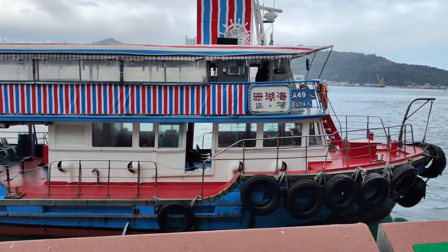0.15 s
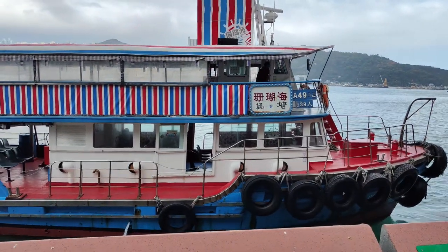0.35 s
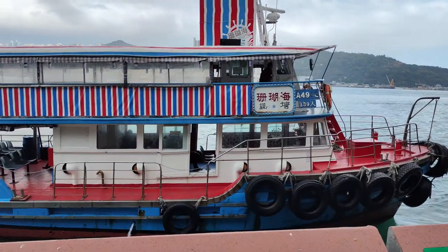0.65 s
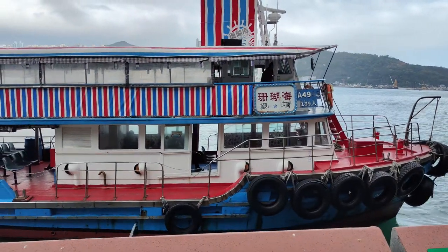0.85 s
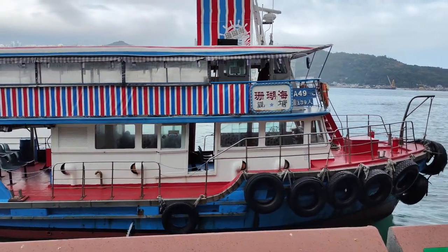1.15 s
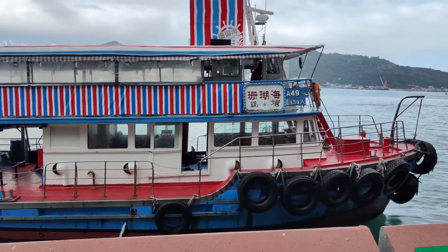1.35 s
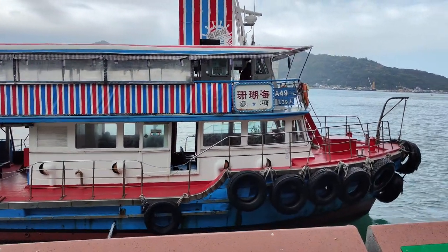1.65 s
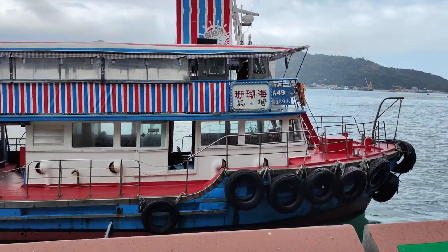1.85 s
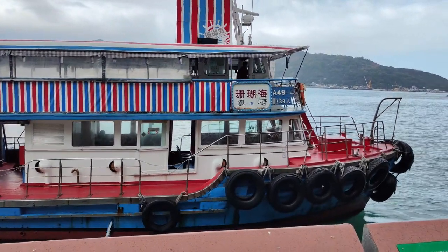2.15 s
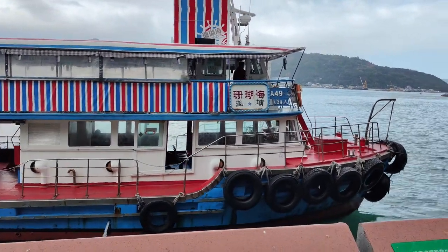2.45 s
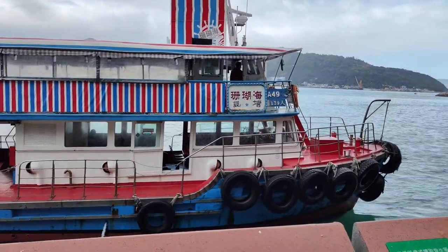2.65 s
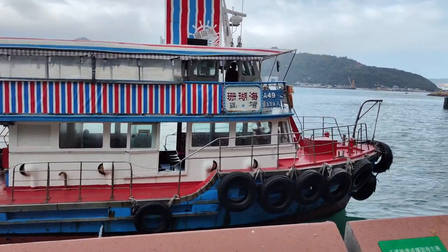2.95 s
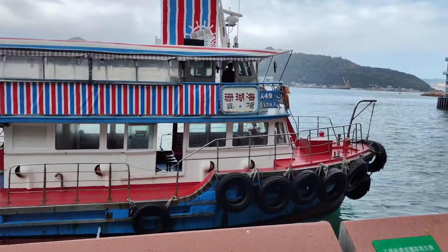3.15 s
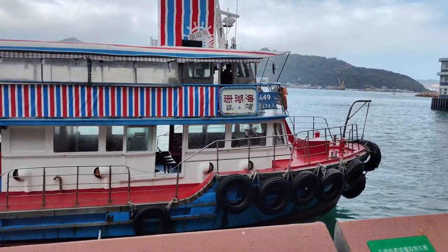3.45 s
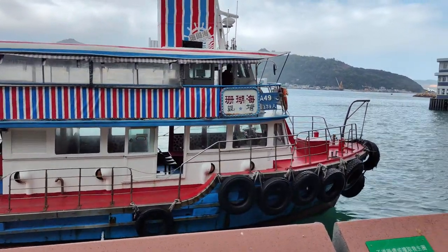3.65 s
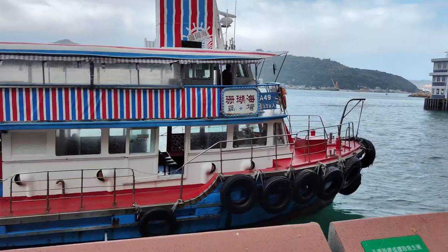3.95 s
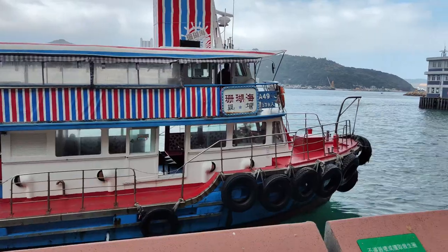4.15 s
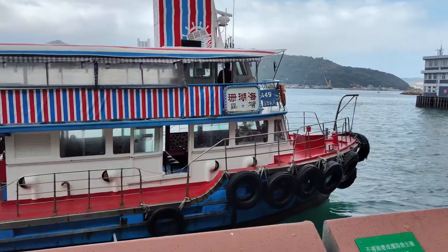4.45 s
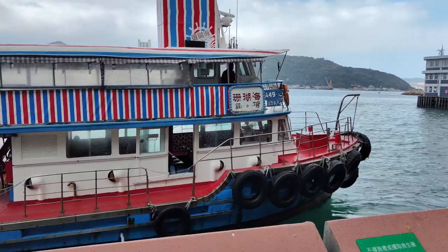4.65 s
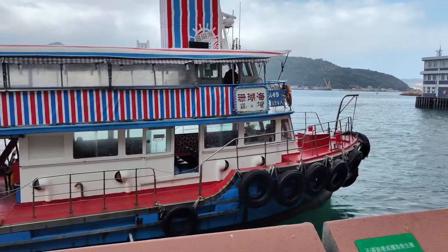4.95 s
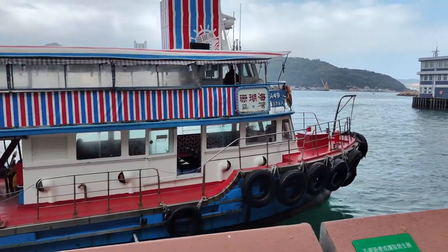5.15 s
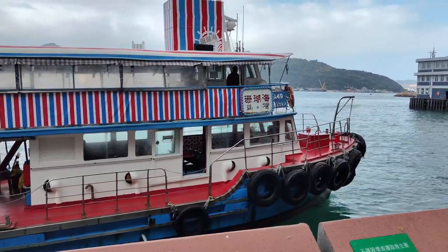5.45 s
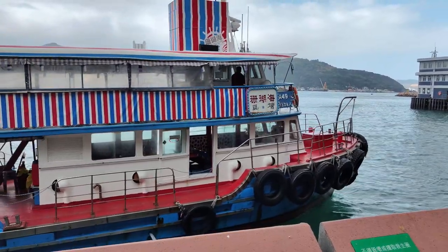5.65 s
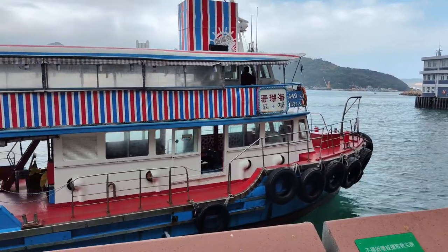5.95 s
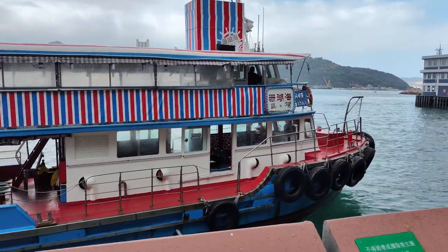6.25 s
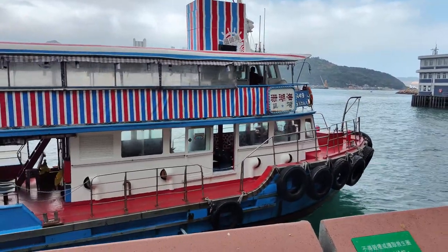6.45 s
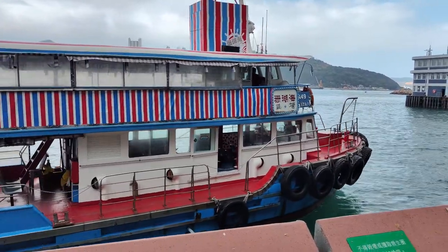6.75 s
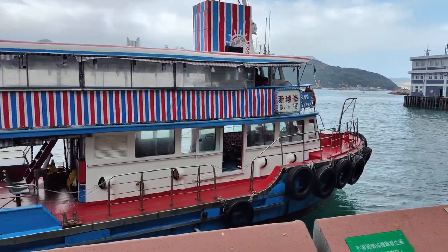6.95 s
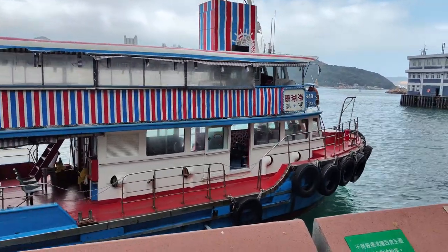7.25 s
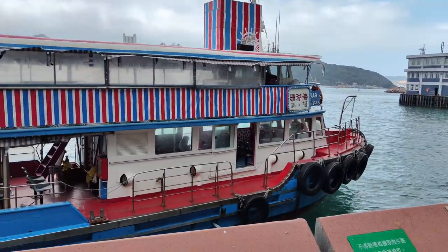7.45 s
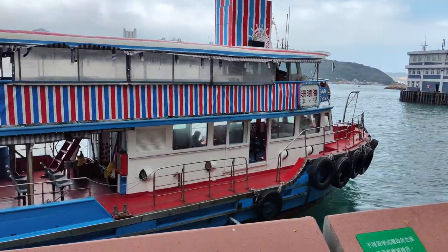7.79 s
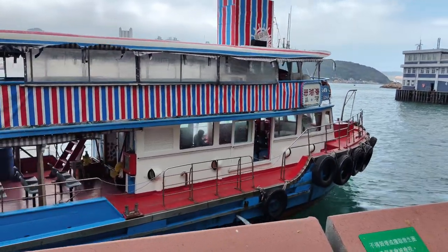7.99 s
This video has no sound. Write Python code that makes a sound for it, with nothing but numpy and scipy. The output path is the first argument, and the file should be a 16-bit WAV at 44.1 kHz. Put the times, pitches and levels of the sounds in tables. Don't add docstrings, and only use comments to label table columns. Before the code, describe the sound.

A small ferry's six-cylinder diesel runs continuously a few metres away in open harbour air, captured in plain phone stereo. From 0 to 3 seconds it is a deep, fairly smooth drone around 61 Hz with strong low harmonics, slightly wavering, beside steady generator and pump hums, one fading early and another fading after 3.4 seconds. From about 3 to 3.5 seconds the pitch rises to roughly 65 Hz, and low hollow water slaps sound near 3.1, 4.2 and 5 seconds. From 4 to 5.5 seconds the engine grows rougher, with a lumpy throb; propeller churn and watery hiss swell modestly, strongest around 5 to 5.6. Near 5.7 the pitch dips and smooths, then from 6.6 climbs again to about 68 Hz, lumpy once more, cutting off still running at 8.1. Fine bubbling and dull hull rumble stay quietly underneath throughout.

```python
import sys
import numpy as np
from scipy import signal
from scipy.fft import rfft, irfft, next_fast_len
from scipy.io import wavfile
from scipy.ndimage import uniform_filter1d

SR = 44100
rng = np.random.default_rng(int(sys.argv[2]) if len(sys.argv) > 2 else 0)


def unload_audio(sound):
    columns = np.transpose(np.atleast_2d(sound))
    steps = np.round(np.clip(columns, -1, 1) * 32767)
    wavfile.write(sys.argv[1], SR, steps.astype(np.int16))


def volts(x):
    e = np.asarray(x, float) / 20
    return 10 ** e


N = 358091

# time in seconds, firing rate in Hz.
FIRING_RATE = [(0, 59.67), (.3, 60.9), (1.5, 60.96), (2.4, 61.16), (2.74, 60.93), (2.91, 61.13),
               (3.25, 62.46), (3.51, 64.84), (4.7, 66.62), (4.86, 67.27), (5.5, 67.12), (5.71, 64.86),
               (5.88, 64.07), (6.54, 63.87), (7.2, 66.66), (7.6, 67.36), (8.12, 68.46)]
# level in dB running light, level in dB under load.
ORDER_DB = [(-73, -70), (-64.5, -53), (-37.7, -35.8), (-55, -49.5), (-56, -48.5), (-19, -18), (-51, -41.5),
            (-60, -54.5), (-55, -47), (-55, -52), (-53, -42), (-24.5, -34.5), (-59, -54), (-60, -60),
            (-52, -43), (-48.5, -31.5), (-54, -47), (-30, -43), (-46.5, -46.5), (-59.5, -56), (-54, -39),
            (-57, -43), (-58, -44), (-42.5, -49.5), (-51, -58), (-73, -58.5), (-57.5, -49), (-66.5, -55),
            (-68, -55), (-58, -61)]
# time in seconds, firing tone in dB, pulse sharpness in dB,
# unevenness of the cylinders (0-1).
EFFORT = [(0.0, -19.88, 0.24, 0.17), (0.7, -20.25, 3.4, 0.31), (1.45, -17.19, -0.17, 0.06),
          (1.75, -17.46, -3.0, -0.01), (2.7, -20.11, 2.87, 0.15), (3.15, -19.26, -0.61, 0.04),
          (3.9, -18.55, 1.28, 0.36), (4.15, -18.49, -3.42, 0.86), (4.35, -18.63, 5.66, 0.79),
          (4.7, -19.16, 1.01, 0.86), (4.9, -23.62, 3.24, 1.0), (5.15, -19.14, -1.59, 1.11),
          (5.75, -17.97, -5.85, 0.03), (5.95, -19.31, 2.45, 0.49), (6.3, -17.49, 0.44, 0.37),
          (7.0, -16.2, -2.08, 0.68), (7.35, -16.29, -7.96, 0.87), (8.12, -18.32, 4.06, 0.89)]
FUNNEL_RATES_HZ = (61, 64, 66.5)
# order, level in dB at each of the three rates, share of the sharpness (0-1).
FUNNEL = [
    (12, -25.3, -28, -35.5, 1),
    (18, -31, -31, -43.5, 1),
    (21, -54, -40.7, -38.8, .5),
    (24, -43.5, -40, -49.5, .6),
]
# order, level in dB even, level in dB uneven.
LUMPS = [
    (16, -52, -28),
    (23, -60, -41),
    (33, -61, -51),
]
# order, centre in seconds,
# half-length in seconds, gain in dB.
PLATES = [(24, .9, .15, 4), (36, .7, .4, 10), (18, 2.25, .15, 2), (30, 2.6, .42, 11), (37, 2.55, .35, 13),
          (24, 3.15, .25, 3), (36, 3.2, .4, 15), (12, 3.9, .2, 3), (21, 4.9, .25, 3), (23, 4.9, .25, 3),
          (36, 5.1, .2, 6), (12, 5.35, .25, -6), (16, 5.45, .12, 4), (30, 6, .2, 12), (24, 6.4, .3, 2)]
# frequency in Hz, level in dB, fade-out time in seconds,
# wobble in dB, starting phase in radians.
AUXILIARY = [
    (65.5, -31, 3.4, .7, 2.2),
    (75.55, -37, 9, 2.5, -1.7),
    (152.4, -39, 1.5, 1.2, 1.),
    (137.5, -50, 9, 3., 0.),
]
# time in seconds, wash level in dB.
CHURN = [(0, -54), (1.6, -57.5), (2.15, -55.5), (3.04, -56), (3.65, -52), (3.96, -54), (4.49, -53.5),
         (5.05, -48.5), (5.25, -50.5), (5.63, -47), (5.8, -50.5), (6.6, -52.5), (7.55, -56.5),
         (7.89, -53.5), (8.12, -55)]
# frequency in Hz, density in dB per Hz.
RUMBLE = [(14, -69), (22, -60.5), (45, -59), (70, -55.5), (90, -65), (125, -61.5), (165, -63), (280, -71.5),
          (450, -72), (620, -78), (950, -79), (1300, -87), (1900, -96), (2400, -110)]
# frequency in Hz, density in dB per Hz.
WASH = [(1000, -8), (1400, -4.5), (1950, -7.5), (2550, -1), (3050, -5), (3900, -8), (4700, -9),
        (5400, -7.5), (6800, -7.5), (7600, -22.5), (8500, -33), (10000, -27), (11500, -33), (15200, -51)]
# frequency in Hz, left minus right in dB.
PORTS = [(250, 2), (500, -4.5), (860, 3), (1200, -1), (2500, 1), (4300, 4), (5400, 5.5), (6700, 26.5),
         (7400, 9.5), (8100, -8.5), (8800, -15), (9200, 1), (11000, -6.5)]
# frequency in Hz, left-right likeness (0-1).
LIKENESS = [(60, 0.5), (230, 1), (400, 0.8), (600, 0), (900, 0), (12000, 0.01)]
# start in seconds, peak in dB, pitch in Hz, length in cycles.
GULPS = [
    (3.077, -28.5, 246, 17),
    (3.18, -32.5, 370.5, 28),
    (4.21, -28.5, 428, 18),
    (4.98, -33, 402, 15),
]

CYLINDERS = 6
LIGHT_HZ, LOADED_HZ = 62.5, 65.3
TOP_ORDER, TOP_DB, TOP_SCATTER_DB = 48, (-63, -59), 2.5
TONE_LEAD_RAD = .8
BETWEEN_LAG_RAD, BETWEEN_LEAD_RAD, BETWEEN_SCATTER_RAD = 1.9, 3, .5
TURN_S, TURN_LENGTH_S = 6.6, .6
HULL_DB, HULL_DB_PER_CHURN_DB, CALM_DB, HULL_FADE_DB_S = -49.6, .5, -55, -.21


def walk(rate):
    control_hz = 500
    hold = int(control_hz / rate)
    held = np.repeat(rng.standard_normal(control_hz * N // SR // hold + 2), hold)
    smooth = 1.55 * uniform_filter1d(uniform_filter1d(held, hold), hold)
    return np.interp(np.arange(N) * control_hz / SR, np.arange(len(held)), smooth)


def curves(table):
    s, *columns = np.transpose(table)
    return [np.interp(np.arange(N) / SR, s, column) for column in columns]


def over_hz(table, hz):
    at_hz, value = np.transpose(table)
    return np.interp(np.log(hz + 1), np.log(at_hz), value)


def order_levels(firing_hz, load):
    t = np.arange(N) / SR
    tone_db, sharp_db, uneven = curves(EFFORT)
    scatter_db = TOP_SCATTER_DB * rng.standard_normal((TOP_ORDER - len(ORDER_DB), 2))
    top = np.add(TOP_DB, scatter_db)
    levels = {}
    for order, (light_db, loaded_db) in enumerate([*ORDER_DB, *top], 1):
        reflection_db = .6 * np.log(order) * walk(2)
        db = light_db + load * (loaded_db - light_db) + reflection_db
        levels[order] = db - 5 * (3 < order < 11)
    levels[CYLINDERS] = tone_db
    for order, *rate_db, share in FUNNEL:
        levels[order] = np.interp(firing_hz, FUNNEL_RATES_HZ, rate_db) + share * sharp_db
    for order, even_db, uneven_db in LUMPS:
        levels[order] = even_db + uneven * (uneven_db - even_db)
    for order, s, half_s, gain_db in PLATES:
        window = np.exp(-((t - s) / half_s) ** 4)
        levels[order] = levels[order] + (gain_db + 1.5 * walk(6)) * window
    return levels


def exhaust():
    firing_hz, = curves(FIRING_RATE)
    highest_hz = np.maximum.accumulate(firing_hz)
    load = np.clip((highest_hz - LIGHT_HZ) / (LOADED_HZ - LIGHT_HZ), 0, 1)
    uneven = curves(EFFORT)[2]
    strain = np.clip((uneven - .45) / .3, 0, 1)
    firing_rad = 1.8 - 2 * np.pi + 2 * np.pi * np.cumsum(firing_hz) / SR
    turned = np.clip((np.arange(N) / SR - TURN_S) / TURN_LENGTH_S, 0, 1)
    out = 0
    for order, db in order_levels(firing_hz, load).items():
        multiple, between = order / CYLINDERS, order % CYLINDERS
        phase = multiple * firing_rad - (multiple - 1) + .2 * np.log(multiple) * walk(1.5)
        if between:
            spread = BETWEEN_SCATTER_RAD * (1 - turned / 2 + (order > len(ORDER_DB)))
            scatter = spread * (rng.standard_normal() + walk(1))
            late = turned * (2 * np.pi * (.5 - between / CYLINDERS) - 1)
            phase = phase + BETWEEN_LEAD_RAD * strain - BETWEEN_LAG_RAD + late + scatter
        else:
            phase = phase + TONE_LEAD_RAD * strain * (multiple - 1)
        out = out + volts(db) * np.cos(phase)
    return np.sqrt(2) * out


def auxiliary():
    t = np.arange(N) / SR
    out = 0
    for hz, db, end_s, wobble_db, phase in AUXILIARY:
        fade_db = 25 * np.clip((t - end_s) / .4, 0, 1)
        level_db = db + wobble_db * walk(3) - fade_db
        drift_rad = .2 * wobble_db * walk(2)
        out = out + volts(level_db) * np.cos(2 * np.pi * hz * t + phase + drift_rad)
    return np.sqrt(2) * out


def ports(x, lag_s):
    return np.array([x, np.interp(np.arange(N) - lag_s * SR, np.arange(N), x)])


def bands(spectrum, ref_hz, level_db, swell_db, flicker_db, flicker_rate):
    size = next_fast_len(N)
    hz = np.arange(size // 2 + 1) * SR / size
    like = np.clip(over_hz(LIKENESS, hz), 0, 1)
    mid = np.sqrt(1 + like) * rfft(rng.standard_normal(size))
    side = np.sqrt(1 - like) * rfft(rng.standard_normal(size))
    tilt_db = over_hz(PORTS, hz)
    colour = volts(over_hz(spectrum, hz)) * (hz > spectrum[0][0]) * (hz < spectrum[-1][0])
    left, right = mid + side, (mid - side) * volts(-tilt_db)
    both = colour * np.array([left, right]) / np.sqrt(1 + volts(-2 * tilt_db))
    inside = (hz > ref_hz[0]) & (hz < ref_hz[1])
    both = both * size / np.sqrt(2 * np.sum(abs(both.mean(axis=0)[inside]) ** 2))
    place = 3 * np.log2((hz + 1) / spectrum[0][0])
    out, swell = 0, walk(1.5)
    for k in range(int(place[colour > 0].max()) + 2):
        share = np.cos(np.pi / 2 * np.clip(place - k, -1, 1)) ** 2
        swell = 0.75 * swell + 0.36 * walk(3.8)
        gain = volts(swell_db * swell + flicker_db * walk(flicker_rate))
        out = out + gain * irfft(both * share, size)[:, :N]
    return out * volts(level_db)


def hull_rumble(wash_db):
    churn_db = HULL_DB_PER_CHURN_DB * (wash_db - CALM_DB)
    level_db = HULL_DB + churn_db + HULL_FADE_DB_S * np.arange(N) / SR
    return bands(RUMBLE, (550, 1200), level_db, swell_db=1.15, flicker_db=1.55, flicker_rate=10)


def propeller_wash(wash_db):
    wash = bands(WASH, (1800, 7000), wash_db - .7, swell_db=0.0, flicker_db=0.53, flicker_rate=14)
    return wash * volts(.7 * walk(20))


def droplets(wash_db, rate_hz=150, drop_db=-64):
    chance = rng.random((int(rate_hz * N / SR), 4))
    at = (chance[:, 0] * N).astype(int)
    size_db = drop_db + wash_db[at] - wash_db.mean() - 2.5 * np.log(chance[:, 1] + .01)
    pitch_hz = 900 * 7 ** chance[:, 2]
    small = np.c_[at / SR, size_db, pitch_hz, 4 + 0 * at, chance[:, 3]]
    gulps = [(*gulp, .5) for gulp in GULPS]
    out = np.zeros((2, N + SR))
    for s, db, hz, cycles, pan in [*small, *gulps]:
        turn = np.arange(int(cycles * SR / hz)) * hz / SR
        shape = np.sin(np.pi * np.sqrt(turn / cycles)) ** 2
        glide = 1 + .1 * turn / cycles ** 2
        ring = volts(db) * shape * np.sin(2 * np.pi * turn * glide)
        start = int(s * SR)
        out[:, start:start + len(turn)] += np.sqrt([[2 * pan], [2 - 2 * pan]]) * ring
    return out[:, :N]


def scene():
    wash_db = curves(CHURN)[0]
    machinery = ports(exhaust() + auxiliary(), lag_s=3.6e-4)
    return machinery + hull_rumble(wash_db) + propeller_wash(wash_db) + droplets(wash_db)


def roll_off(x):
    return signal.sosfilt(signal.butter(12, 15100, fs=SR, output="sos"), x)


def record(dry):
    return roll_off(dry)


dry = scene()
out = record(dry)
unload_audio(out)
```